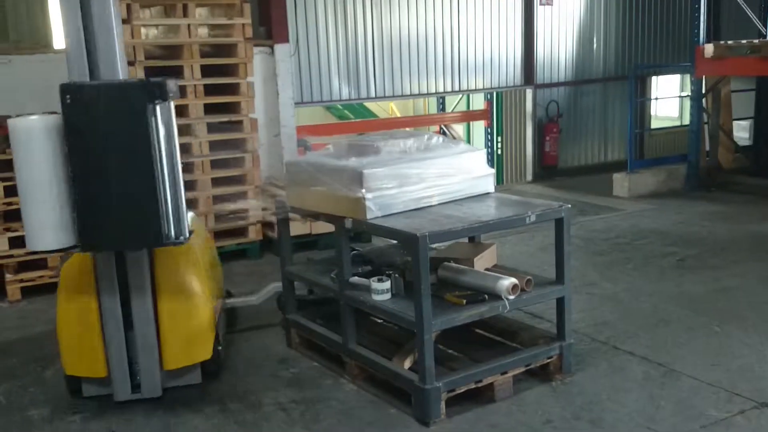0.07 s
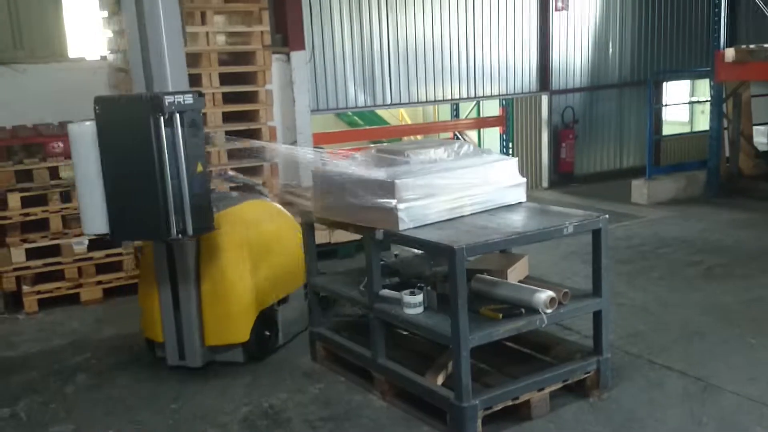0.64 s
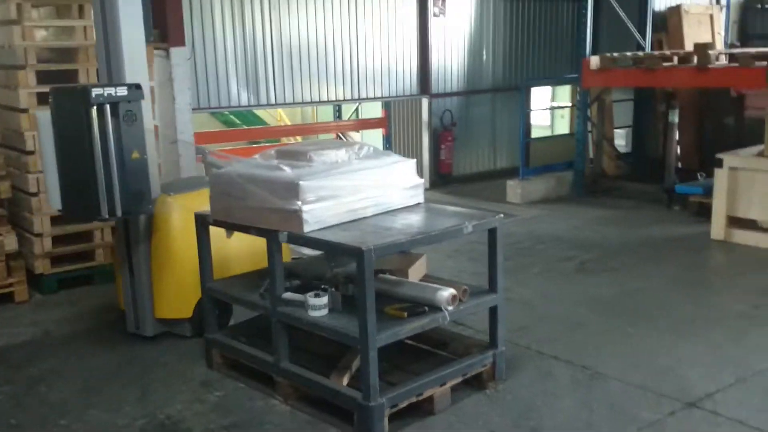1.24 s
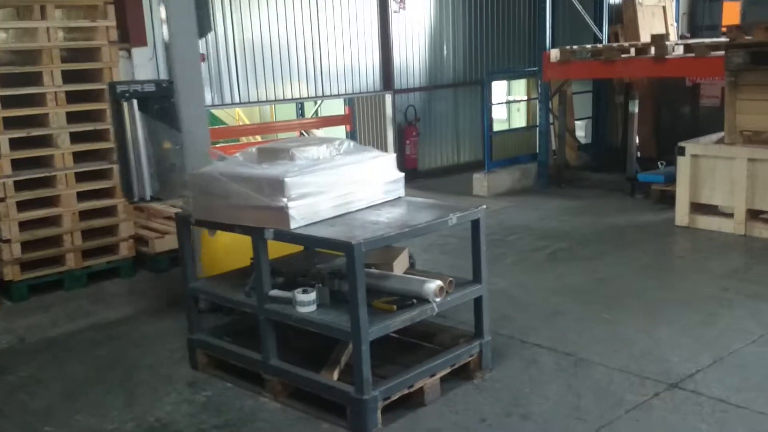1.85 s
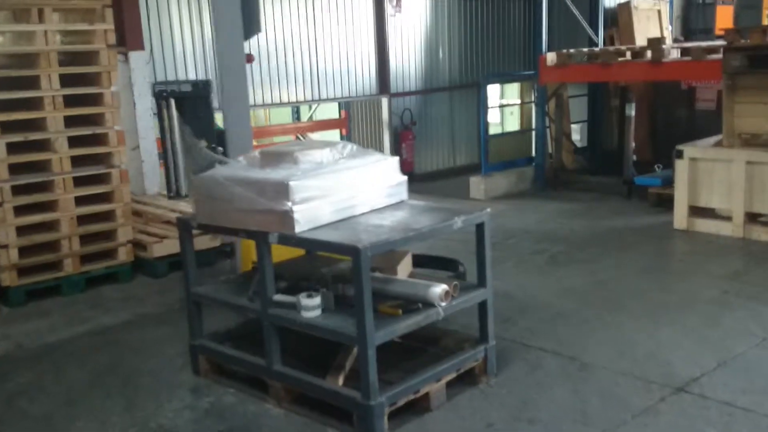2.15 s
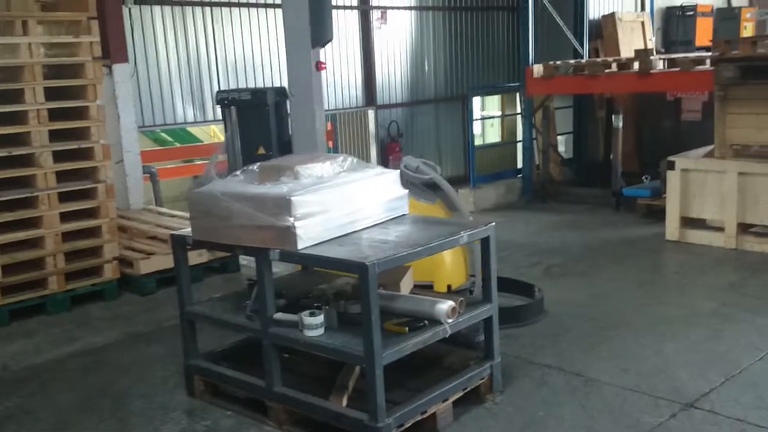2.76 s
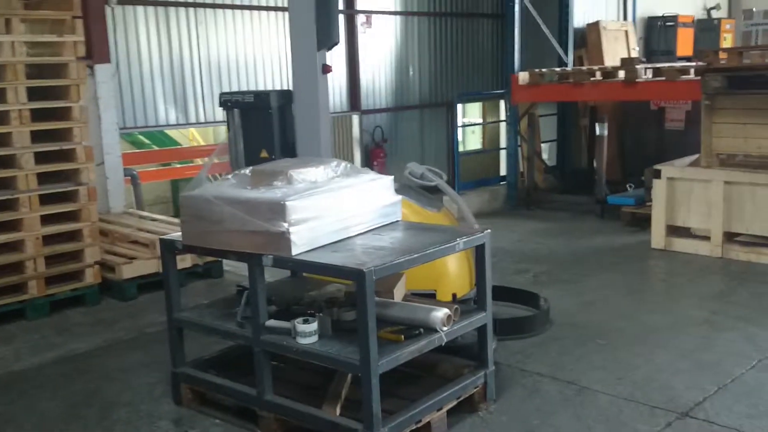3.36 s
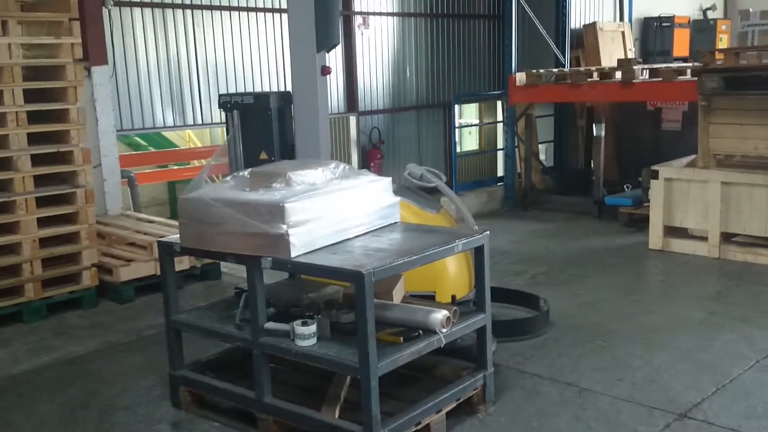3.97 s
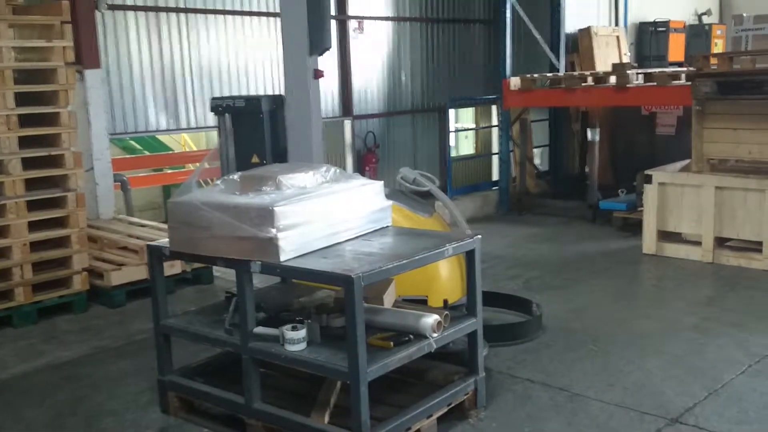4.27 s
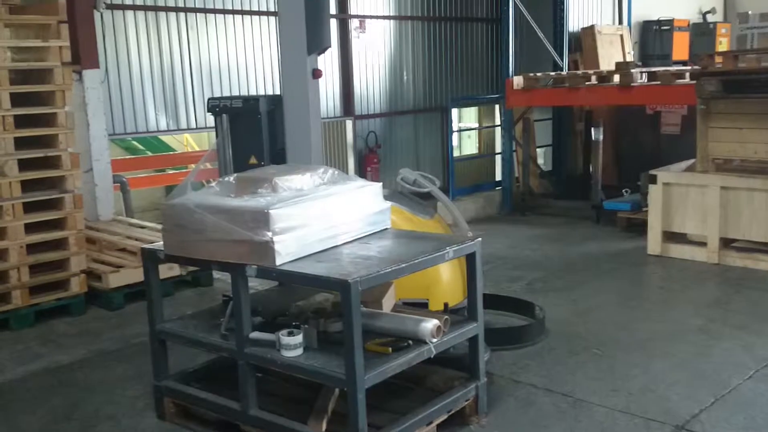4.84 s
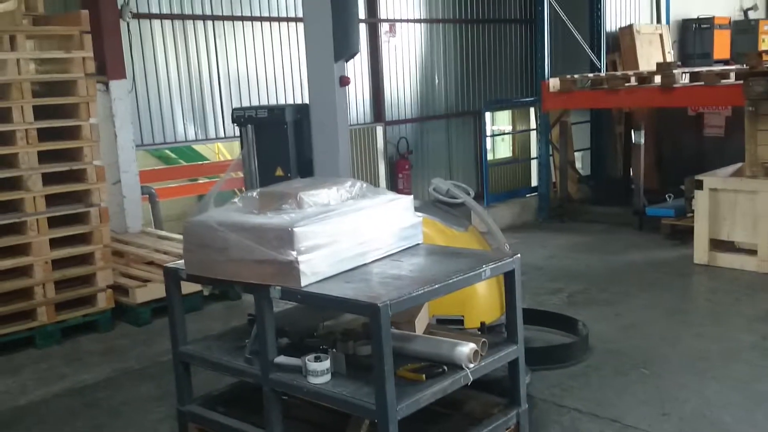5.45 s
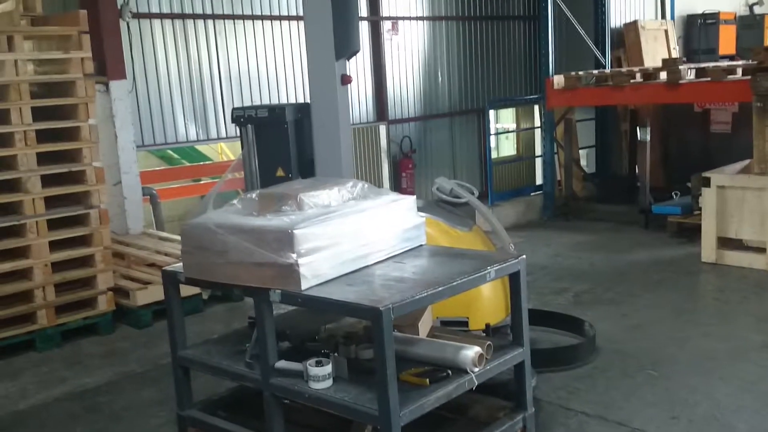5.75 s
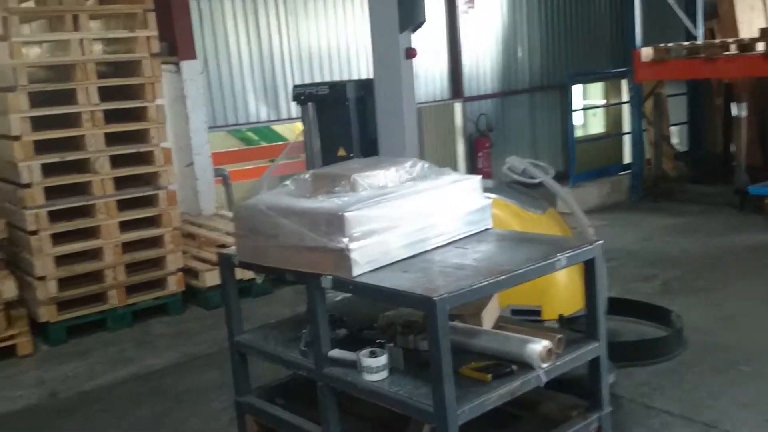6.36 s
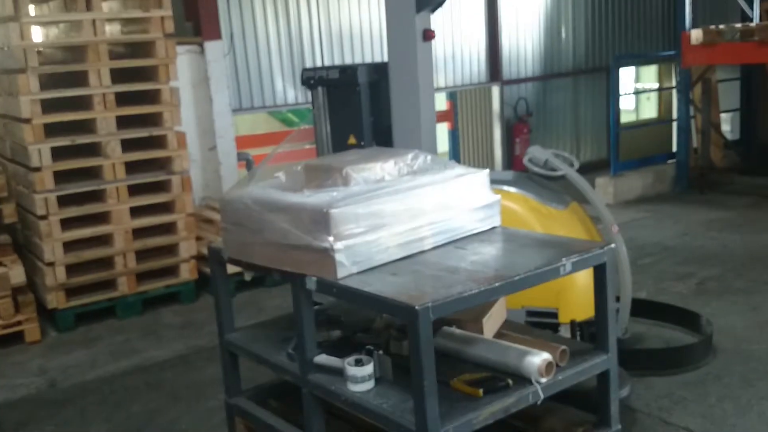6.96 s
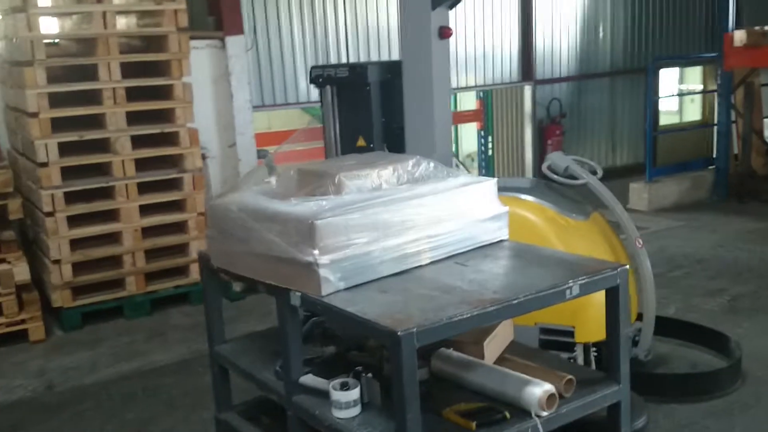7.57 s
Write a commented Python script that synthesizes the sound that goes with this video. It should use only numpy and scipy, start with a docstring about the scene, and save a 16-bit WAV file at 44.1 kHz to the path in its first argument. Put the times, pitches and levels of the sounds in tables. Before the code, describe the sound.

A click, then stretch film rips and crackles off a wrapping robot in an echoing warehouse, until it stops with a screech and whines quietly.

```python
"""First comes a short, loud click, then bright rips of stretch film echo in a warehouse: on the left,
a robot drives round a pallet load and wraps it. The film peels off its roll in tiny snaps that drum on
the taut sheet, and it squeaks on the rollers. After three seconds the robot stops with a last screech
and stands with a whine, a hum and a faint hiss. A few soft knocks sound close by, a mechanism clicks
and a small motor speeds up."""
import sys
import numpy as np
from scipy import signal
from scipy.fft import rfft, irfft, next_fast_len
from scipy.io import wavfile
from scipy.ndimage import uniform_filter1d, map_coordinates

SR = 44100
rng = np.random.default_rng(int(sys.argv[2]) if len(sys.argv) > 2 else 0)


def dump_mix(stems):
    """Bounce the given channels to the path in sys.argv[1] as a 16-bit WAV at rate SR."""
    frames = np.atleast_2d(stems).T  # one column per channel
    limited = np.clip(frames, -1, 1)  # hard clip at full scale
    pcm = np.round(limited * 32767).astype(np.int16)
    wavfile.write(sys.argv[1], SR, pcm)


N = 340011


# Levels in the tables are starting points: the functions and the final mix add their own gains.
# a short, loud opening click (first row), then the film's rips; each has two ringing notes:
# t/s, rise/s, length/s, release/s, level/dB, ring f/Hz, ring level/dB, creak level/dB
CLICK_AND_RIPS = [(0.0, 0.003, 0.0091, 0.0016, -24, 4560, -2, -25),
                  (0.064, 0.032, 0.046, 0.026, -38, 4400, -18.5, 0),
                  (0.204, 0.0087, 0.034, 0.024, -23.5, 4300, -5.5, -15),
                  (0.337, 0.004, 0.018, 0.006, -26.5, 4390, -6, -16),
                  (0.584, 0.014, 0.023, 0.01, -27, 4290, -5.5, -12.5),
                  (0.818, 0.021, 0.042, 0.019, -31, 4550, -8.5, -8),
                  (1.056, 0.06, 0.18, 0.0076, -48, 5740, 4.5, -1),
                  (1.231, 0.029, 0.03, 0.04, -32, 4130, -6.5, -17),
                  (1.568, 0.078, 0.037, 0.024, -28, 4340, -4.5, -3.5),
                  (1.645, 0.01, 0.035, 0.029, -32, 4940, -7.5, -8),
                  (2.016, 0.047, 0.03, 0.041, -26.5, 4900, -10, -8),
                  (2.123, 0.0063, 0.023, 0.0069, -34, 4600, -13, -9),
                  (2.367, 0.16, 0.098, 0.011, -30.5, 4370, -21, -5),
                  (2.428, 0.019, 0.031, 0.039, -26.5, 4830, -14, -7.5)]
# tone of their snaps: f/Hz, level/dB
SNAP_TONE = [(500, -9.5), (1000, -6.5), (1750, -23.5), (2150, 2), (2450, -13), (2740, -7.5), (3100, -14.5),
             (3800, -2.5), (5800, -1), (7000, -5), (10000, -13.5), (12500, -12), (15000, -31)]

def click_and_rips():
    """An opening click, then rips: stuck film lets go in snaps that ring it; tension bends the pitch."""
    def ringing(hz, width):
        kicks = snaps(len(t), rate=1500, spread_db=1.5)
        return unit(filtered(kicks, lambda f: resonance(f, hz, width) * resonance(f, hz, 1500)))
    out, t = np.zeros(N), np.arange(SR // 4) / SR
    crackle = unit(amp(1.7 * wobble(250)))
    bend = 0.03 * wobble(45)
    creaks = 2794 * np.exp(0.028 * rng.standard_normal(len(CLICK_AND_RIPS)))
    for (s, rise, length, release, db, ring_hz, ring_db, creak_db), creak_hz in zip(CLICK_AND_RIPS, creaks):
        start = round(s * SR)
        volley = coloured(snaps(len(t), rate=4500, spread_db=3), SNAP_TONE)
        ring = amp(ring_db) * ringing(ring_hz, width=260)
        creak = amp(creak_db) * ringing(creak_hz, width=240)
        burst = drifting(unit(volley + ring + creak), bend[start:])
        burst += amp(-9) * brief_squeaks(t, length)
        shape = np.minimum(t / rise, 1) * np.exp(-np.maximum(t - length, 0) / release)
        add(out, s, amp(db) * shape * crackle[start:][:len(t)] * burst)
    return out


def brief_squeaks(t, length, count=5, centre_hz=3560, squeak_s=0.016):
    """Brief squeaks of random pitch, scattered over length seconds."""
    hz = centre_hz * np.exp(0.34 * rng.standard_normal((count, 1)))
    age = np.clip((t - length * rng.random((count, 1))) / squeak_s + .5, 0, 1)
    return np.sum(np.sin(np.pi * age) ** 2 * np.sin(2 * np.pi * hz * t), axis=0)


# the film feeds faster, and so louder, round each corner of the load: t/s, level/dB
FILM_FEED = [(0.03, -34), (0.19, -35), (0.28, -32.5), (0.48, -33.5), (0.8, -40.5), (0.87, -40), (1.08, -40),
             (1.27, -38.5), (1.52, -45.5), (1.67, -38.5), (1.87, -36.5), (1.96, -40.5), (2.2, -38.5),
             (2.37, -33), (2.55, -36), (2.73, -38), (2.9, -45.5)]

def feed_db(full_db=-33):
    """How hard the film is feeding, in dB compared with full feed."""
    return curves(FILM_FEED)[0] - full_db


# tones of the drumming sheet, its rustle and the sizzle where it leaves the roll: f/Hz, level/dB
DRUM_TONE = [(25, -14), (45, -8), (70, -7), (130, -0.5), (185, -4.5), (240, 1), (380, 3), (540, 2.5),
             (650, -3), (830, 0), (1200, -10), (2500, -46)]
RUSTLE_TONE = [(400, -10), (850, 2), (1300, 5.5), (1750, 3), (2200, 3), (3200, -1), (6000, -15),
               (12000, -52)]
SIZZLE_TONE = [(1200, -4.5), (2100, 2), (2700, 2), (3200, -6), (4400, 4.5), (6000, 8), (7000, 0),
               (9000, -13.5), (12500, -13), (15000, -63)]
PEEL_END_S = 2.755

def peeling():
    """The film sticks and slips on its roll. Each slip drums, rustles and sizzles; rips add a tug."""
    def layer(tone, db, growth, tug_db, rate, spread_db):
        level = rolling() * np.hypot(amp(db + growth * feed_db()), amp(tug_db) * tug)
        return level * coloured(slips * snaps(N, rate, spread_db), tone)
    # the level jumps with the opening click and whenever a rip jerks the sheet, then settles
    tug = sum(amp(db) * ramp(s, 0.016) * np.exp(-since(s + length) / 0.069)
              for s, _, length, _, db, *_ in CLICK_AND_RIPS)
    slip_hz = 85 * np.exp(.25 * wobble(60))
    cycle = np.cumsum(slip_hz) / SR % 1
    slips = unit((0.74 + np.exp(-cycle / 0.73)) * amp(1.88 * wobble(70)))
    drum = layer(DRUM_TONE, db=-34.5, growth=1.355, tug_db=-26, rate=2600, spread_db=0.9)
    rustle = layer(RUSTLE_TONE, db=-37.5, growth=1.5, tug_db=-12.5, rate=3000, spread_db=1.5)
    sizzle = layer(SIZZLE_TONE, db=-37.5, growth=1.88, tug_db=-5.5, rate=3700, spread_db=9.5)
    return drum + rustle, (1 - ramp(PEEL_END_S, 0.03)) * sizzle  # the sizzle stops first


def crinkles(count=150, centre_hz=4210, fade_s=0.0049):
    """Creases in the running film pop at random, each a tiny flutter at its own pitch."""
    out, t = np.zeros(N), np.arange(SR // 40) / SR
    for when, pitch, softness in zip(rng.random(count), rng.standard_normal(count), rng.random(count)):
        hz = centre_hz * np.exp(0.298 * pitch)
        flutter = rng.standard_normal(len(t)) * np.exp(-t / fade_s)
        pop = filtered(flutter, lambda f: resonance(f, hz, width=790) / (1 + (f / 7000) ** 8))
        add(out, when * PEEL_END_S, amp(-25 - 9.5 * softness) * pop / np.abs(pop).max())
    return out * amp(1.4 * feed_db())


# low drone of the rolling robot: f/Hz, width/Hz, level/dB
DRONE_BANDS = [(74.2, 39, -2.5), (117, 89, -12)]
# swells of the groaning gears: t/s, level/dB
GEAR_GROAN = [(0.0, -58), (0.24, -48), (0.5, -50), (0.74, -55), (0.88, -39.5), (1.15, -63), (1.28, -42.5),
              (1.52, -61.5), (1.88, -41), (1.98, -51), (2.25, -52), (2.45, -58), (2.76, -50.5)]
BRAKE_S = 2.753

def drive():
    """The robot rolls with a low, lumpy drone while its gears groan, until it brakes."""
    drone_db = -53.5 + 0.34 * feed_db() + 2 * wobble(15)
    drone = amp(drone_db) * unit(filtered(rng.standard_normal(N), lambda f: bands(DRONE_BANDS, f)))
    groan_hz = 531.5 * (1 + 0.03 * wobble(11))
    groan = amp(curves(GEAR_GROAN)[0]) * fuzzy_tone(groan_hz, width=55)
    return rolling() * (drone + groan)


def rolling():
    """1 while the robot drives, 0 once it has braked."""
    return 1 - ramp(BRAKE_S, 0.18)


# tone of the deep rumble: f/Hz, level/dB
RUMBLE_TONE = [(8, -0.5), (25, -8), (45, -17), (66, -14), (110, -49), (400, -80)]

def rumble(step):
    """A deep rumble, louder while the robot rolls and when a step jostles the microphones."""
    moving = 1 - ramp(BRAKE_S, 0.96)
    level_db = -64 + 8.5 * moving + 5.5 * step + 1.11 * wobble(4.5)
    return amp(level_db) * coloured(rng.standard_normal((2, N)), RUMBLE_TONE)


# clacks and bumps: t/s, level/dB, f/Hz, width/Hz, time to fade by 60 dB/s
CLACKS = [(0.255, -38, 786, 500, 0.11), (0.435, -41, 129, 110, 0.14), (1.115, -46.5, 138, 120, 0.17),
          (1.615, -49, 690, 200, 0.7), (1.863, -38.5, 890, 970, 0.3), (2.354, -38, 100, 90, 0.16),
          (3.076, -50, 1440, 400, 0.22), (3.15, -52.5, 310, 1300, 0.86), (3.633, -60.5, 3200, 3020, 0.29),
          (3.639, -60.5, 190, 600, 0.3), (5.812, -64, 110, 130, 0.23)]

def clatter():
    """Clacks and bumps: short bursts of noise, each round its own pitch."""
    out, t = np.zeros(N), np.arange(SR) / SR
    attack = 1 - np.exp(-t / 0.00078)
    for s, db, hz, width, fade in CLACKS:
        noise = rng.standard_normal(len(t))
        burst = unit(filtered(noise, lambda f: resonance(f, hz, width) ** 2 / (1 + (f / 6500) ** 8)))
        add(out, s, amp(db - 60 * t / fade) * attack * burst)
    return out


# squeaks on the rollers: t/s, length/s, f/Hz, level/dB
ROLLER_SQUEAKS = [(2.032, 0.018, 2854, -25), (2.147, 0.031, 2740, -38), (2.283, 0.017, 2090, -25),
                  (2.324, 0.013, 4360, -28.5), (2.329, 0.012, 3190, -28.5), (2.362, 0.013, 1680, -26),
                  (2.395, 0.035, 3190, -36)]

def roller_squeaks(climb_per_s=1):
    """The film catches on a roller and sings one short, slightly rising note."""
    out, t = np.zeros(N), np.arange(SR // 10) / SR
    waver = 0.0089 * wobble(200)
    for s, length, hz, db in ROLLER_SQUEAKS:
        pitch = hz * (1 + climb_per_s * (t - length / 2) + waver[round(s * SR):][:len(t)])
        shape = np.sin(np.pi * np.minimum(t / length, 1)) ** 2
        add(out, s, amp(db) * shape * np.sin(phase_of(pitch)))
    return out


# ringing notes of the screech: f/Hz, width/Hz, level/dB
SCREECH_NOTES = [(1066, 76, -5.5), (1400, 70, 1.5), (2030, 93, 3), (2700, 460, -1.5), (3750, 220, 3),
                 (4630, 1200, -1), (5220, 430, 5), (7360, 860, -30)]
# tone of the scrape that starts it: f/Hz, level/dB
SCRAPE_TONE = [(700, -23), (1050, -7.5), (2100, 12.5), (3200, 5), (4800, -14), (6400, 14), (7800, 9),
               (9500, -12), (11800, -5.5), (15000, -25)]

def screech(start=3.065):
    """A sharp scrape, then a quarter second of fast slips that ring a few shrill notes."""
    def notes(f):
        ringing = sum(amp(db) * resonance(f, hz, width) for hz, width, db in SCREECH_NOTES)
        return ringing / (1 + (f / 7500) ** 8)
    slipping = swell(start, rise=0.0092, hold=0.18, fall=0.099) * amp(-34 - 67 * since(start))
    scraping = ramp(start, 0.0045) * amp(-31 - 518 * since(start + 0.027))
    ring = slipping * unit(filtered(snaps(N, rate=3400, spread_db=-2.0), notes))
    scrape = scraping * coloured(snaps(N, rate=1900, spread_db=2.5), SCRAPE_TONE)
    return ring + scrape


# slow changes in the background: t/s, air level/dB, hiss level/dB
BACKGROUND_LEVELS = [(3.9, -72.5, -73), (4.26, -72, -74), (4.82, -70.5, -73.5), (5.07, -69, -70.5),
                     (6.11, -73, -74), (7.42, -66.5, -71.5), (7.7, -69.5, -70.5)]
# tones of the moving air and of the hiss: f/Hz, level/dB
AIR_TONE = [(40, -30.5), (70, -11.5), (160, -12.5), (260, -11), (400, -10.5), (650, -9), (950, -10.5),
            (1200, -12), (1800, -17.5), (3000, -60)]
HISS_TONE = [(900, -17), (1500, -3.5), (2200, -2), (3000, 0.5), (3600, 0), (4200, -1), (5400, 1.5),
             (6500, -5.5), (7400, -9.5), (8500, -20), (15000, -25.5)]

def air_and_hiss():
    """Moving air and a faint hiss fill the hall all along; they come through once the robot stands."""
    air_db, hiss_db = curves(BACKGROUND_LEVELS)
    air = amp(air_db + 5.0 + .7 * wobble(3.56)) * hall_noise(lambda f: amp(along(AIR_TONE, f)))
    hiss = amp(hiss_db + 11.5 + .8 * wobble(9)) * hall_noise(lambda f: amp(along(HISS_TONE, f)))
    return air + hiss


# the drive's whine at the left microphone: t/s, level/dB
LEFT_WHINE = [(3.4, -62), (3.9, -65.5), (5.3, -59.5), (6.15, -58), (6.42, -65), (6.72, -57), (7.3, -63.5),
              (7.65, -58)]

def whine(step, hz=1297.4):
    """The drive whines. A step briefly takes the right microphone out of a standing wave's quiet spot."""
    phase = phase_of(hz + .5 * wobble(5.7))
    ears_db = np.array([curves(LEFT_WHINE)[0], -75 + 15.5 * step])
    right_lag = 1.41 + 1.47 * step  # radians
    return np.sqrt(2) * amp(ears_db + wobble(13)) * np.sin([phase, phase - right_lag])


# thin bands of noise that sing over the hiss: f/Hz, width/Hz, level/dB
SINGING_BANDS = [(994, 30, 0), (1940, 230, 1.5), (2480, 49, 3), (2620, 54, 4.5), (3180, 45, 4),
                 (3830, 160, 1.5), (4430, 92, 4), (4580, 86, 4.5), (5420, 170, -1)]

def singing(groups=2):
    """Thin bands of noise swell and drift in pitch, each group in its own way."""
    out, n = np.zeros((2, N)), np.arange(N)
    for k in range(groups):
        clock = n + np.cumsum(.005 * wobble(6))
        group = hall_noise(lambda f: bands(SINGING_BANDS[k::groups], f))
        out += amp(1.5 * wobble(7)) * np.array([np.interp(clock, n, ear) for ear in group])
    return ramp(3.82, 0.28) * amp(-62.5) * unit(out)


def hum(hz=160):
    """The standing machine's low hum fades in and wavers a little."""
    level = ramp(4.53, 1.0) * amp(-76.5 + 1.7 * wobble(10))
    return np.sqrt(2) * level * np.sin(phase_of(hz + 1.31 * wobble(4.7)))


# faint whirs: t/s, rise/s, hold/s, fall/s, f/Hz, climb/(Hz per s), width/Hz, level/dB
RISING_WHIRS = [(4.74, 0.08, .55, 0.18, 2750, 399, 800, -70), (6.42, 0.11, 0.94, .2, 2946, 538, 702, -66)]

def whirs():
    """Uneven bands of noise drift upward in pitch."""
    out = np.zeros((2, N))
    for s, rise, hold, fall, hz, climb, width, db in RISING_WHIRS:
        band = np.array([fuzzy_tone(hz + climb * since(s), width) for ear in range(2)])
        out += swell(s, rise, hold, fall) * amp(db + 3.3 * wobble(16)) * band
    return out


# soft knocks: t/s, level/dB, f/Hz, rough length/cycles
SOFT_KNOCKS = [(5.02, -39, 614, 1.1), (5.028, -42, 595, 0.98), (6.2587, -38.5, 740, 2.1),
               (7.2932, -33, 724, 1.1), (7.3, -42, 650, 0.57)]

def knocks():
    """Dull taps close by, each dying away within a few swings."""
    out, t = np.zeros(N), np.arange(SR // 20) / SR
    for s, db, hz, cycles in SOFT_KNOCKS:
        age = 2 * t * hz / cycles
        add(out, s, amp(db) * (age * np.exp(1 - age)) ** 2 * np.sin(2 * np.pi * hz * t))
    return out


# clicks of the mechanism: t/s, level/dB, f/Hz
MECHANISM_CLICKS = [(5.570, -50, 2600), (5.577, -49, 1500), (5.586, -52, 2800), (5.589, -54, 5600)]

def mechanism(width_hz=2200, fade_s=0.043):
    """A light mechanism clicks a few times in a quick row."""
    out, t = np.zeros((2, N)), np.arange(SR // 20) / SR
    for s, db, hz in MECHANISM_CLICKS:
        for ear in out:
            noise = rng.standard_normal(len(t))
            burst = unit(filtered(noise, lambda f: resonance(f, hz, width_hz) / (1 + (f / 6500) ** 12)))
            add(ear, s, amp(db - 60 * t / fade_s) * burst)
    return out


# the small motor's climbing note: t/s, f/Hz, level/dB
MOTOR_NOTE = [(6.45, 2990, -76), (6.6, 3040, -74), (6.8, 3090, -80), (7.0, 3260, -72), (7.17, 3400, -70),
              (7.33, 3330, -73), (7.43, 3520, -76)]

def small_motor():
    """A small motor speeds up with a faint, rough whine."""
    hz, db = curves(MOTOR_NOTE)
    running = swell(5.9, rise=0.06, hold=0.98, fall=0.06)
    return running * amp(db) * np.array([fuzzy_tone(hz, width=170) for ear in range(2)])


# how alike the hall sounds in both ears: f/Hz, likeness (1 = the same)
EAR_LIKENESS = [(60, 0.67), (290, 0.6), (640, 0.58), (1400, -0.15), (3000, 0.022)]

def stereo_shares(f):
    """How much of the hall's sound the ears share (mid) and how much differs (side)."""
    turn = np.arccos(np.clip(along(EAR_LIKENESS, f), -1, 1)) / 2
    return np.array([np.cos(turn), np.sin(turn)])


def hall_noise(gain):
    """Stereo noise shaped by gain(f), alike in both ears only at low pitches."""
    mid, side = filtered(rng.standard_normal((2, N)), lambda f: gain(f) * stereo_shares(f))
    return unit(np.array([mid + side, mid - side]))


# how long the hall echoes: f/Hz, time to fade by 60 dB/s
ECHO_TIMES = [(100, 0.88), (500, 0.84), (2000, 0.97), (4000, 0.85), (6000, 0.57), (9000, 0.62),
              (14000, 0.34)]

def hall(x, build_s=0.00062, block=8192):
    """Echoes build up, then each pitch fades at its own speed. As things move, the echoes change."""
    out = np.zeros((2, N + 2 * SR))
    f, t = np.fft.rfftfreq(256, 1 / SR), np.arange(300) * 128 / SR
    fade = amp(-60 * t / along(ECHO_TIMES, f)[:, None]) * (1 - np.exp(-t / build_s))
    shares = stereo_shares(f)[..., None]
    for start in range(0, N, block):
        real, imag = rng.standard_normal((2, 2) + fade.shape)
        mid, side = signal.istft((real + 1j * imag) * fade * shares, nperseg=256)[1]
        tail = np.array([mid + side, mid - side]) / np.sqrt(np.sum(mid ** 2 + side ** 2))
        echo = signal.fftconvolve(x[None, start:start + block], tail, axes=1)
        out[:, start:start + echo.shape[1]] += echo
    return out[:, :N]


def from_left(x, balance, lead_s=0):
    """Tilt x between the ears by (Hz, left minus right dB) points; the left hears it lead_s earlier."""
    ears = np.array([[1], [-1]]) / 2
    return filtered(x, lambda f: amp(ears * along(balance, f)) * np.exp(2j * np.pi * f * ears * lead_s))


def amp(db):
    """Turn decibels into a gain."""
    return 10 ** (np.asarray(db) / 20)


def unit(x):
    """Scale x to an average strength (rms) of 1."""
    return x / np.sqrt(np.mean(x ** 2) + 1e-20)


def along(points, hz):
    """Read between (Hz, value) points on a log frequency scale."""
    f, v = np.transpose(points)
    return np.interp(np.log(hz + 1), np.log(f + 1), v)


def curves(rows):
    """One value per sample for each column after the time."""
    s, *cols = np.transpose(rows)
    return [np.interp(np.arange(N) / SR, s, c) for c in cols]


def wobble(rate):
    """A smooth curve through rate random values a second."""
    knots = np.arange(0, N * rate / SR + 1, 1 / 8)
    smooth = map_coordinates(rng.standard_normal(int(knots[-1]) + 4), [knots])
    return np.interp(np.arange(N) * rate / SR, knots, smooth)


def filtered(x, response):
    """Scale each frequency f in x by response(f)."""
    n = x.shape[-1]
    m = next_fast_len(n + 8192, True)
    return irfft(rfft(x, m) * response(np.fft.rfftfreq(m, 1 / SR)), m)[..., :n]


def resonance(f, hz, width):
    """Response of something that rings at one pitch."""
    return 1j * f * width / (hz * hz - f * f + 1j * f * width)


def bands(rows, f):
    """Response made of separate (Hz, width, dB) bands."""
    return np.sqrt(sum(amp(db) ** 2 / (1 + ((f - hz) / (0.32 * width)) ** 2) ** 2 for hz, width, db in rows))


def coloured(x, tone):
    """Shape x by a tone of (Hz, dB) points, at strength 1."""
    return unit(filtered(x, lambda f: amp(along(tone, f))))


def snaps(size, rate, spread_db):
    """Tiny snaps of random size at random moments, rate a second."""
    moments = rng.random(size) < rate / SR
    return moments * rng.choice([-1, 1], size) * amp(spread_db * rng.standard_normal(size))


def phase_of(hz):
    """The running angle of a wave that follows a pitch curve."""
    return 2 * np.pi * np.cumsum(hz) / SR


def fuzzy_tone(hz, width):
    """A thin band of noise that follows a pitch curve."""
    return unit(np.real((wobble(width) + 1j * wobble(width)) * np.exp(1j * phase_of(hz))))


def drifting(x, share):
    """Bend the pitch of x along a curve; 0.01 is one percent up."""
    return map_coordinates(x, [np.arange(len(x)) + np.cumsum(share[:len(x)])], mode="mirror")


def since(start):
    """Seconds gone by since start, 0 before it."""
    return np.maximum(np.arange(N) / SR - start, 0)


def ramp(start, rise):
    """0 until start, then up to 1 within rise seconds."""
    return np.minimum(since(start) / rise, 1)


def swell(start, rise, hold, fall):
    """Rise to 1, hold, then fall back to 0."""
    return ramp(start, rise) - ramp(start + rise + hold, fall)


def add(track, s, sound):
    """Mix a sound into a track at time s."""
    room = track[max(round(s * SR), 0):][:len(sound)]
    room += sound[:len(room)]


# leftward tilt of the opening click and rips, then of all the robot's sound and the echo:
# f/Hz, left minus right/dB
BURST_BALANCE = [(1000, -15), (2400, 22.5), (4400, 20), (8000, 14.5), (12000, 8)]
OVERALL_BALANCE = [(60, 2.5), (200, 3), (400, 6), (1300, 3), (2400, 2.5), (4400, 5.5), (8000, -1.5),
                   (15000, 1.5)]

def scene():
    """The robot and its film on the left, small sounds in the middle, and the echoing hall around them."""
    bursts, shrill = click_and_rips(), screech()
    sheet, sizzle = peeling()
    pops = crinkles()
    body = sheet + drive() + roller_squeaks()
    taps, bumps, clicks = knocks(), clatter(), mechanism()
    robot = amp(-0.5) * body + amp(-13.0) * sizzle + amp(3.0) * shrill + pops
    direct = from_left(amp(-5.0) * bursts, BURST_BALANCE, lead_s=0.000201)
    direct += from_left(robot, [(500, -0.32), (2000, 0.96), (4000, -1.2), (10000, -1.3)], lead_s=0.00022)
    echo = hall(amp(-2.0) * bursts + amp(-4.0) * body + amp(-1.5) * sizzle + amp(-3.5) * (shrill + pops)
                + amp(-5.5) * (taps + clicks[0]) + amp(2.5) * bumps)
    step = swell(6.18, rise=0.56, hold=0.15, fall=1.0)  # whoever holds the microphones takes a step
    air = air_and_hiss()
    machine = whine(step) + hum() + rumble(step)
    background = (air + singing()) * amp([[.8], [-.8]])  # a little louder on the left
    middle = taps + clicks + amp(3.0) * bumps + whirs() + small_motor()
    return from_left(direct + echo, OVERALL_BALANCE) + machine + background + middle


def record(dry):
    """A noise suppressor turns faint treble down, cutting echoes short; the very top is removed."""
    treble_hz, top_hz, threshold_db, depth_db = 4260, 15700, -46.5, 6.5
    treble = filtered(dry, lambda f: f ** 6 / (f ** 6 + treble_hz ** 6))
    power = uniform_filter1d(np.mean(treble ** 2, axis=0), size=1300)
    level_db = 10 * np.log10(np.abs(power) + 1e-12)
    gain = amp(-depth_db * np.clip(threshold_db - level_db, 0, 1))
    return filtered(dry + (gain - 1) * treble, lambda f: f < top_hz)


dry = scene()
out = record(dry)
dump_mix(out)
```